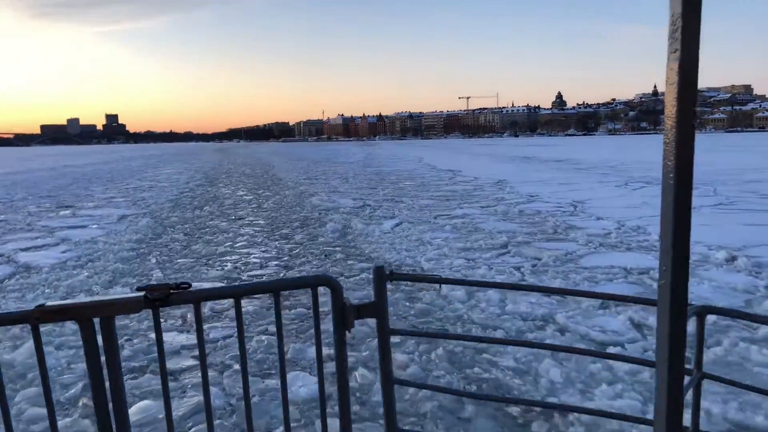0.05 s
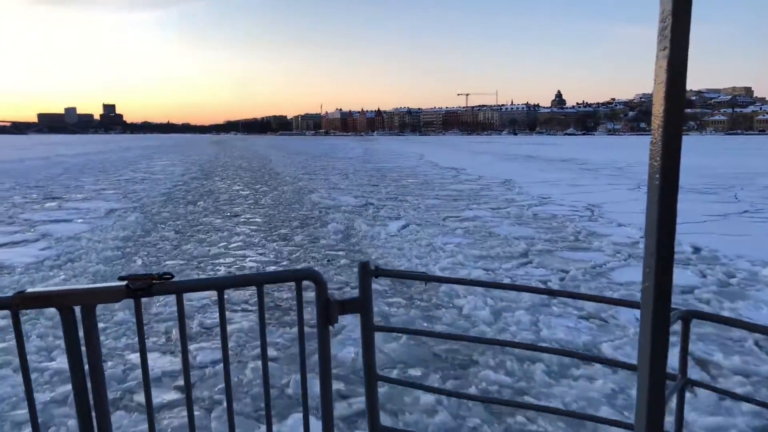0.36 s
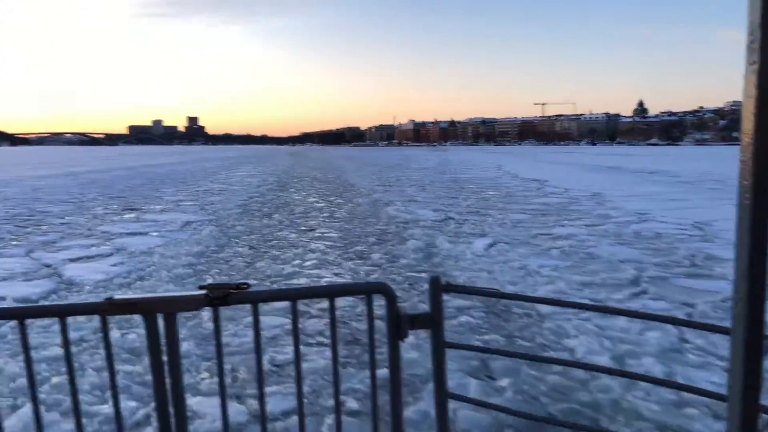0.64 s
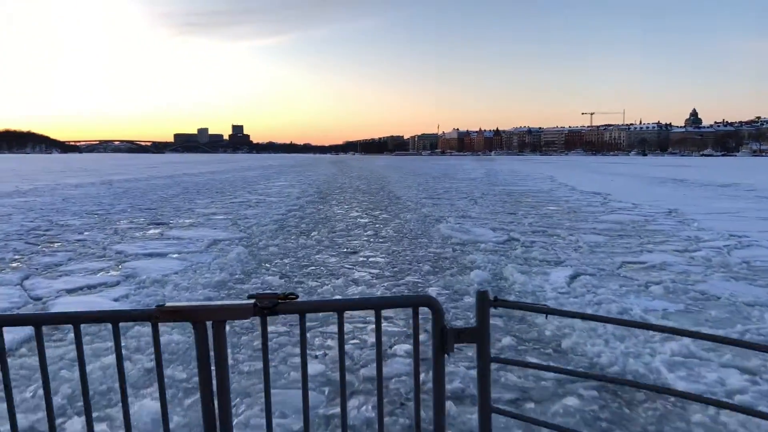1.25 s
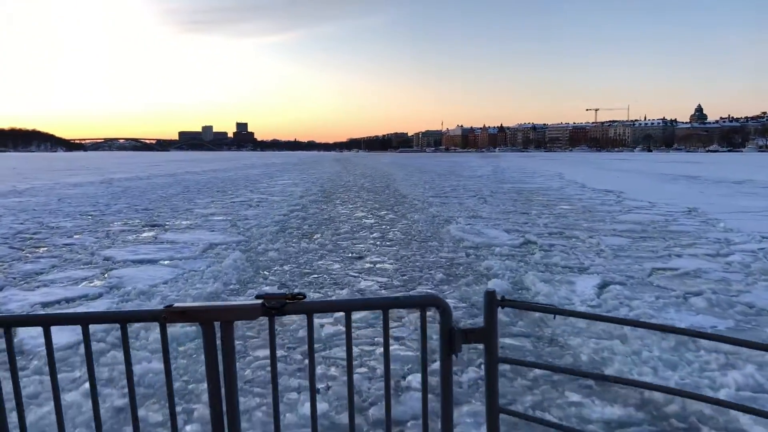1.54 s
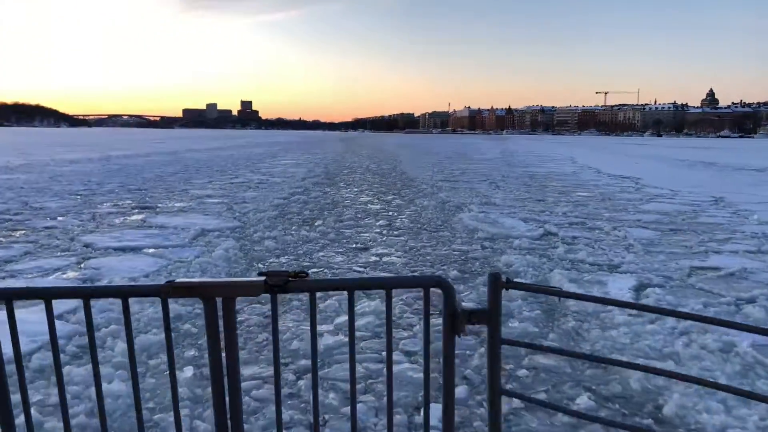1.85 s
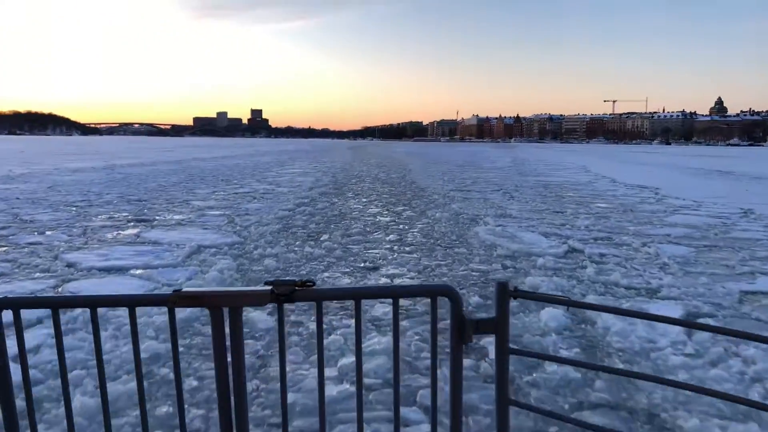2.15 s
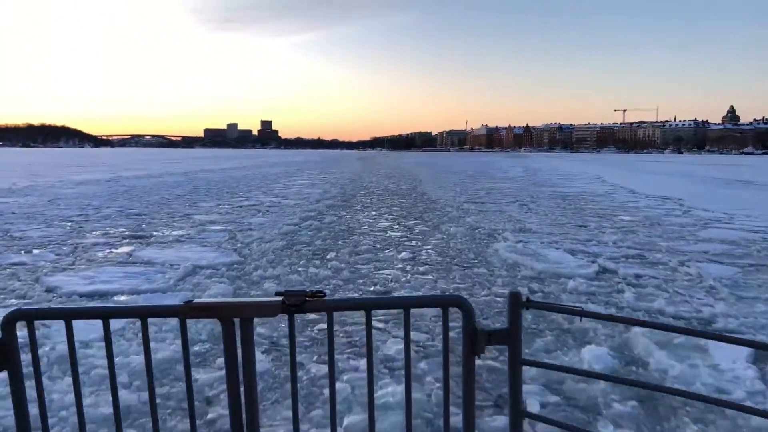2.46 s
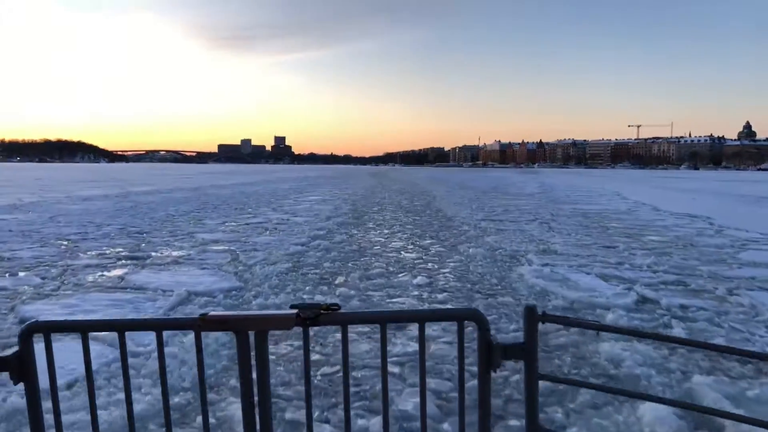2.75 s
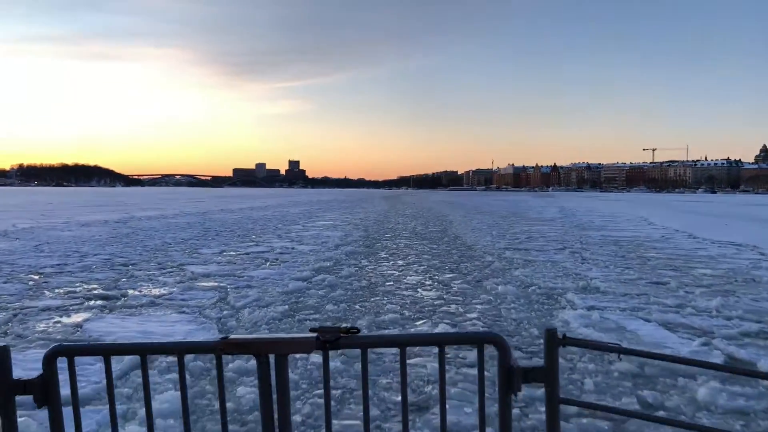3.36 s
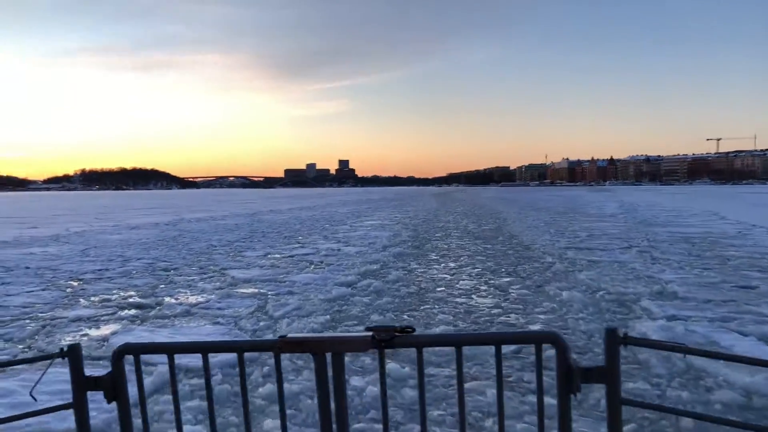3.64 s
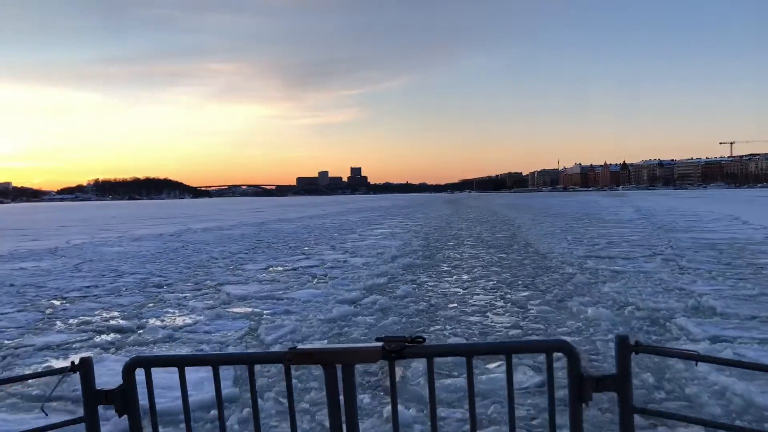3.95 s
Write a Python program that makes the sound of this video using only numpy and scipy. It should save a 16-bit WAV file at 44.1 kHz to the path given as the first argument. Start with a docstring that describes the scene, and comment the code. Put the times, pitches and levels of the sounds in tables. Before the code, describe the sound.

A boat pushes through broken ice, its engine and propeller rumbling under a churning, fizzing wake for all four seconds. Floes thump and knock irregularly against the hull while loose chunks clunk hollowly. Gritty crunches and cracks cluster from about 0.5 to 1.1 seconds, return near 1.9, and again from 3.5 to the end, with a few faint icy clinks. The loudest thumps slightly overload the microphone.

```python
"""Stern deck in broken ice.

Engine and propeller shake the hull of a boat; the wake churns and fizzes, loose ice clunks in it.
Floes crunch against each other and thump along the plating.
The loudest thumps just overload the microphone."""
import sys
import numpy as np
from scipy.fft import rfft, irfft, next_fast_len
from scipy.io import wavfile
from scipy.ndimage import map_coordinates

SR = 44100
rng = np.random.default_rng(int(sys.argv[2]) if len(sys.argv) > 2 else 0)


def wav_record(signal):
    """Record a signal, one row per channel, as 16-bit PCM in the file named by sys.argv[1]."""
    frames = np.transpose(np.atleast_2d(signal))
    bounded = np.clip(frames, -1, 1)
    # unit amplitude maps onto the largest positive 16-bit level
    quanta = np.round(bounded * 32767).astype(np.int16)
    wavfile.write(sys.argv[1], SR, quanta)


N = 176400
LEAD_S = 0.06  # start of a burst to full strength


def amp(db):
    """Decibels to gain."""
    return 10 ** (np.asarray(db) / 20)


def unit(x):
    """Scale to rms 1."""
    return x / np.sqrt(np.mean(x ** 2) + 1e-20)


def curve(rows):
    """One value per sample from rows of time_s, value."""
    return np.interp(np.arange(N) / SR, *np.transpose(rows))


def wobble(knots_per_s):
    """Smooth random curve, spread about 1."""
    position = np.arange(N) * knots_per_s / SR + 2
    return map_coordinates(rng.standard_normal(8000), [position], mode="mirror")


def filtered(x, response):
    """Filter x by response(hz)."""
    size = next_fast_len(len(x) + 8192)
    return irfft(rfft(x, size) * response(np.fft.rfftfreq(size, 1 / SR)), size)[:len(x)]


def coloured(x, colour):
    """Filter x by rows of freq_hz, gain_db; scale to rms 1."""
    freq_hz, gain_db = np.transpose(colour)
    return unit(filtered(x, lambda hz: amp(np.interp(np.log(hz + 1), np.log(freq_hz), gain_db))))


def burst(colour, attack_s, hold_s, t60_s, grit_db):
    """Cluster of tiny fractures: grainy noise rises 60 dB in attack_s, holds, dies away."""
    t = np.arange(SR // 3) / SR - LEAD_S
    envelope = amp(-60 * (np.maximum(-t, 0) / attack_s + np.maximum(t - hold_s, 0) / t60_s))
    noise = rng.standard_normal(len(t))
    grain_db = grit_db * np.repeat(rng.standard_normal(len(t)), 20)[:len(t)]
    sound = coloured(noise * amp(grain_db), colour) * envelope
    return sound * np.linalg.norm(envelope) / np.linalg.norm(sound)


def mode(hz, attack_s, t60_s, wander_rad):
    """One ringing mode of a piece of ice, with wandering phase."""
    t = np.arange(SR // 6) / SR
    drift = wander_rad * np.cumsum(rng.standard_normal(len(t))) / np.sqrt(t60_s * SR)
    envelope = (1 - np.exp(-t / attack_s)) * amp(-60 * t / t60_s)
    return np.sin(2 * np.pi * hz * t + drift) * envelope


def add(track, start_s, sound):
    """Mix a sound in at start_s, or at 0 if that is negative."""
    part = track[max(round(start_s * SR), 0):][:len(sound)]
    part += sound[:len(part)]


def engine(firing_hz=30.22, drift=0.006):
    """Slightly unsteady orders of the firing rate."""
    orders = [(2,-30),(3,-28.5),(4,-27),(7,-26),(10,-38)]  # harmonics: multiple, level_db
    phase = 2 * np.pi * np.cumsum(firing_hz * (1 + drift * wobble(5.02))) / SR
    out = np.zeros(N)
    for multiple, level_db in orders:
        tone = amp(3.8 * wobble(7)) * np.sin(multiple * phase + 2 * np.pi * rng.random())
        out += amp(level_db) * unit(tone)
    return out


def propeller(cutoff_hz=1300):
    """Turbulence under the stern rumbles and keeps the hull ringing."""
    rumble_levels = [(0,-15),(.12,-9.5),(.3,-30),(.39,-7),(.5,-19),(.6,-15.5),(.78,-11),(.96,-20.5),(1.03,-8.5),(1.24,-17),(1.35,-23.5),(1.82,-13),(2.08,-13.5),(2.55,-29),(2.65,-14),(2.77,-25),(2.86,-10.5),(3.05,-16.5),(3.35,-14),(4,-21)]  # envelope: time_s, level_db
    rumble_colour = [(20,-36),(32,-12),(41,-22),(55,-1.5),(70,-6),(90,-0.5),(120,-6.5),(200,-31.5),(600,-62)]  # spectrum: freq_hz, gain_db
    resonances = [(133.6,17.7,-5),(168.7,30.6,1.5),(202.2,23.5,1.5),(241.2,27.8,-1),(304.7,27.6,-6),(352,21.5,-12.5),(409,13,-8.5),(481,40,-15.5),(694,80,-20.5),(811,32,-21.5)]  # hull modes: centre_hz, width_hz, gain_db

    def hull(hz):
        response = 0
        for k, (centre_hz, width_hz, gain_db) in enumerate(resonances):
            damping = 1j * hz * width_hz
            response += (-1) ** k * amp(gain_db) * damping / (centre_hz ** 2 - hz ** 2 + damping)
        return response / (1 + (hz / cutoff_hz) ** 4)

    rumble = amp(curve(rumble_levels) - 3.5) * coloured(rng.standard_normal(N), rumble_colour)
    turbulence = rng.standard_normal(N) * amp(1.1 * wobble(14))
    return rumble + amp(-17.5) * unit(filtered(turbulence, hull))


def wake():
    """Lumpy churning water under a smoother fizz of slush."""
    # envelopes: time_s, level_db
    churn_levels = [(0.0, -16.5), (0.18, -18), (0.37, -20.5), (0.61, -20), (0.97, -23), (1.44, -20),
                    (1.88, -20.5), (1.98, -21), (3.38, -20.5), (4.0, -22)]
    fizz_levels = [(0.0, -36), (0.26, -40), (0.39, -41), (0.66, -39.5), (0.83, -42.5), (1.39, -42),
                   (2.62, -44.5), (2.9, -40), (3.55, -43), (4.0, -42.5)]
    # spectra: freq_hz, gain_db
    churn_colour = [(100,-11.5),(300,3),(600,-3),(1050,-4.5),(1600,-12.5),(2500,-20.5),(4000,-31.5),(9000,-48)]
    fizz_colour = [(800,-20.5),(2500,-2),(4400,0),(6000,-5.5),(8500,-7.5),(12000,-11),(15500,-23)]
    churn = coloured(rng.standard_normal(N), churn_colour) * amp(0.57 * wobble(21.99) + 1.3 * wobble(120))
    fizz = coloured(rng.standard_normal(N), fizz_colour) * amp(1.1 * wobble(25.3) + 1.1 * wobble(900))
    return amp(curve(churn_levels) - 0.5) * unit(churn) + amp(curve(fizz_levels)) * unit(fizz)


def jostle(rate_per_s=110, centre_hz=805, spread_octaves=0.597, t60_cycles=22.5, count=1500):
    """Small lumps of ice collide at random in the wake; low notes ring louder and longer."""
    out, t = np.zeros(N), np.arange(SR // 20) / SR
    starts_s = np.cumsum(rng.exponential(size=count)) / rate_per_s
    ratios = 2 ** (spread_octaves * np.clip(rng.standard_normal(count), -2, 2))
    strengths_db = 4.5 * np.minimum(rng.exponential(size=count), 3)
    for start_s, ratio, strength_db in zip(starts_s, ratios, strengths_db):
        cycles = centre_hz * ratio * t
        ring = np.sin(2 * np.pi * cycles) * amp(-60 * cycles / t60_cycles)
        add(out, start_s, amp(strength_db) / ratio * ring)
    return amp(-28.5) * unit(out)


def breaking_ice():
    """Brittle ice crushes in gritty bursts, slabs crack, splinters snap close by."""
    crunches = [(0.042,-36,0.0059),(0.231,-39,.02),(0.305,-37,0.019),(0.555,-31.5,0.01),(.585,-36,0.098),(0.623,-29,0.0097),(0.746,-32.5,0.022),(0.751,-39,.008),(0.782,-32,0.02),(0.819,-35.5,0.014),(1.022,-37,0.0072),(1.071,-34.5,0.014),(1.116,-38,0.0073),(1.816,-37.5,.01),(1.89,-38,0.021),(1.926,-38,0.04),(2.027,-37,0.011),(2.713,-40.5,0.096),(3.758,-35,0.02),(3.785,-35.5,0.017),(3.829,-40,0.017)]  # crushing: start_s, level_db, hold_s
    # single fractures: start_s, level_db
    cracks = [(.558,-11.5),(.996,-18),(1.871,-14),(2.369,-19.5),(3.464,-13.5),(3.966,-20)]
    snaps = [(.629,-29),(1.03,-29),(1.818,-34),(3.5732,-26)]
    # spectra: freq_hz, gain_db
    crunch_colour = [(600,-25),(1800,10.5),(4200,3.5),(6000,-4),(8500,-4),(12000,-17),(15500,-26)]
    crack_colour = [(200,-14),(600,4.5),(1050,2),(1600,-7),(2400,-14),(3500,-27.5),(9000,-43),(15000,-52)]
    snap_colour = [(2000,-30),(5000,-12),(6500,3),(11000,-3),(15000,-12)]
    out = np.zeros(N)
    for start_s, level_db, hold_s in crunches:
        crunch = burst(crunch_colour, attack_s=0.026, hold_s=hold_s, t60_s=0.034, grit_db=-8)
        add(out, start_s - LEAD_S, amp(level_db + 2.5) * crunch)
    for start_s, level_db in cracks:
        crack = burst(crack_colour, attack_s=0.0028, hold_s=0.0031, t60_s=0.049, grit_db=1)
        add(out, start_s - LEAD_S, amp(level_db) * crack)
    for start_s, level_db in snaps:
        snap = burst(snap_colour, attack_s=0.0006, hold_s=0.0004, t60_s=0.0025, grit_db=-2)
        add(out, start_s - LEAD_S, amp(level_db) * snap)
    return out


def loose_ice():
    """Hollow-sounding blocks clunk and thin shards clink as they tumble in the wake."""
    # collisions: start_s, pitch_hz, level_db
    clunks = [(.013,750,-5),(.141,800,-9),(.229,624,-7),(.3,1130,-14),(.311,770,-9),(.365,800,-10),(.555,750,-15),(.556,1690,-19),(.688,590,-6),(.689,1130,-16),(.993,725,-9),(.995,490,-13),(1.293,1210,-17),(1.518,880,-10),(1.53,500,-10),(1.559,1378,-15),(1.871,550,-11),(1.895,836,-7),(1.987,818,-11),(2.215,1010,-14),(2.275,1097,-16),(2.368,735,-6),(2.41,790,-10),(2.68,1040,-13),(2.771,398,-15),(2.856,820,-16),(3.398,715,-7.5),(3.409,667,-12),(3.461,1018,-13.5),(3.724,980,-14),(3.733,796,-8),(3.966,724,-7.5)]
    clinks = [(.043,3370,-31),(.043,4657,-31.5),(.788,4100,-27),(.8,5220,-32),(.815,4075,-34),(3.765,2130,-24),(3.785,2500,-29),(3.788,4404,-32)]
    block_modes = [(1,6.5),(1.45,-9),(2.1,-22)]  # partials: freq_ratio, gain_db
    out = np.zeros(N)
    for start_s, pitch_hz, level_db in clunks:
        for ratio, gain_db in block_modes:
            partial = mode(pitch_hz * ratio, attack_s=0.0015, t60_s=0.045, wander_rad=2.3)
            add(out, start_s, amp(level_db + gain_db - 4) * partial)
    for start_s, pitch_hz, level_db in clinks:
        add(out, start_s, amp(level_db) * mode(pitch_hz, attack_s=0.00076, t60_s=0.099, wander_rad=3.3))
    return out


def floe_blows():
    """Each floe clacks at its edge, knocks, and makes the hull boom."""
    blows = [(.012,-7.5,-13.5,-33),(.144,-16,-18,-26),(0.197,-6,-19,-17.5),(.29,-9.5,-10.5,-15.5),(.366,-11.5,-17.5,-16.5),(.558,-6,-18,-20),(.622,-7,-36,-19),(.686,-10.5,-10,-15),(.72,-9.5,-12.5,-18.5),(.757,-6.5,-15.5,-16),(.993,-14.5,-6.5,-22.5),(1.022,-4.5,-22,-20.5),(1.068,-20,-19,-19.5),(1.127,-9.5,-15,-30),(1.235,-17,-16.5,-21),(1.292,-19,-17.5,-30),(1.49,-9,-16,-21),(1.518,-18,-9.5,-29),(1.556,-16,-10,-20),(1.625,-9.5,-19,-23.5),(1.81,-17,-19,-21),(1.895,-7,-10.5,-19),(2.039,-11.5,-25,-38),(2.115,-14,-16,-32),(2.212,-20,-27,-21),(2.271,-19,-15.5,-17.5),(2.366,-21,-16.5,-21),(2.407,-8,-18,-26),(2.552,-8.5,-23,-40),(2.682,-9.5,-15,-16.5),(2.732,-12,-15,-22.5),(2.768,-8,-8,-20),(2.85,-6,-9.5,-24),(2.985,-6,-34,-25),(3.285,-9.5,-12,-35),(3.398,-12.5,-19,-29),(3.463,-8,-21,-27),(3.622,-6.5,-12.5,-20.5),(3.728,-7.5,-12,-20),(3.794,-12,-22,-21.5),(3.968,-5,-19,-20)]  # hull strikes: start_s, boom_db, knock_db, clack_db
    # spectra: freq_hz, gain_db
    boom_colour = [(40,-57),(85,-11.5),(125,-1.5),(170,-2),(215,-4.5),(300,-10),(450,-34),(1200,-97)]
    knock_colour = [(120,-43),(300,8),(450,5.5),(600,-1.5),(790,2),(1000,-32),(1800,-19),(5000,-70)]
    clack_colour = [(300,-5),(750,-10),(1020,6),(1350,-0.5),(1800,-6),(2800,-20.5),(6000,-28),(15000,-54)]
    floe_envelope = dict(attack_s=0.11, hold_s=0.0082, t60_s=0.17)
    out = np.zeros(N)
    for start_s, boom_db, knock_db, clack_db in blows:
        boom = amp(boom_db - 2.5) * burst(boom_colour, attack_s=0.041, hold_s=0.027, t60_s=0.18, grit_db=3)
        knock = amp(knock_db - 5) * burst(knock_colour, **floe_envelope, grit_db=3)
        clack = amp(clack_db - 4.5) * burst(clack_colour, **floe_envelope, grit_db=3.5)
        add(out, start_s - LEAD_S, boom + knock + clack)
    return out


def scene():
    """Mono mix at the stern rail, in open air."""
    return (engine() + propeller() + wake() + jostle() + floe_blows() + loose_ice() + breaking_ice())[None]


def record(dry):
    """The microphone rounds off the highest peaks and limits the band."""
    ceiling, low_cut_hz, top_hz = 0.98, 27, 15730
    rounded = dry / (1 + np.abs(dry / ceiling) ** 10) ** (1 / 10)

    def band(hz):
        return (hz < top_hz) * (1 - np.exp(-(hz / low_cut_hz) ** 2))

    return np.array([filtered(channel, band) for channel in rounded])


dry = scene()
out = record(dry)
wav_record(out)
```